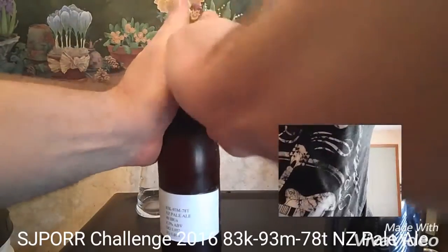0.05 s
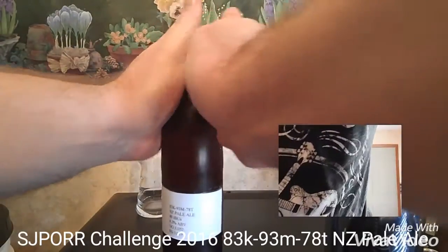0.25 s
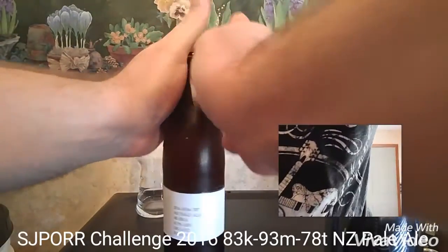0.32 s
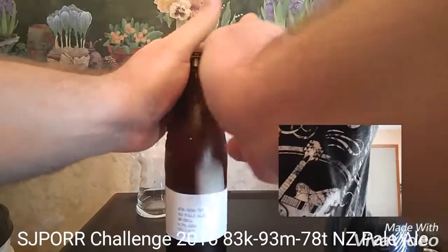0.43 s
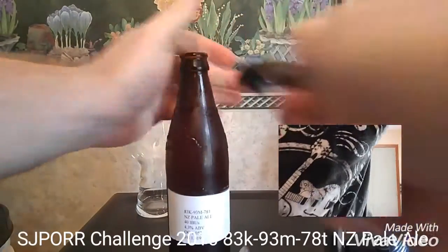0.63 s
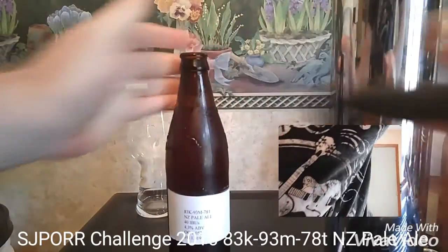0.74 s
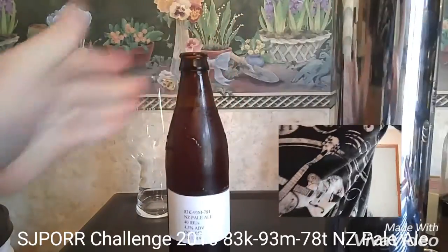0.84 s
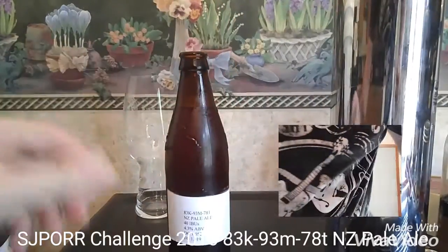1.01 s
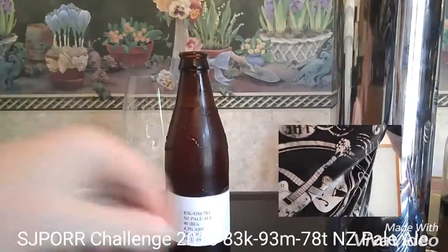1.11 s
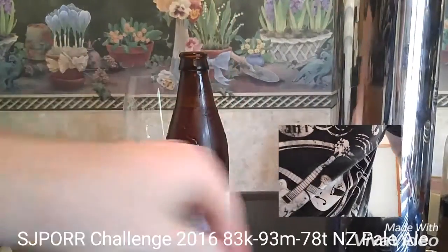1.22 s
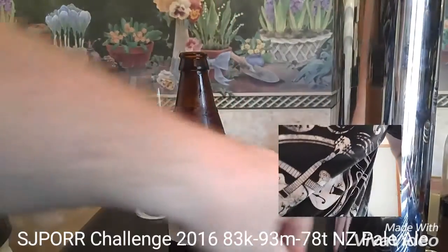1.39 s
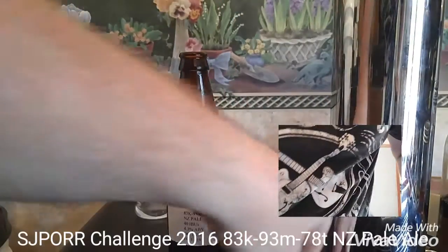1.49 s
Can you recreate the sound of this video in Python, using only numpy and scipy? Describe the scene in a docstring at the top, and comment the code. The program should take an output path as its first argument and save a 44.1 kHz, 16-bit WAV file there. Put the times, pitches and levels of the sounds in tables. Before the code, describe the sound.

A glass bottle is opened close by: steel scrapes and clinks at the neck until the cap pings free. Cap and opener then hit a tabletop with a loud knock and a few ringing bounces, echoing briefly in a quiet room.

```python
"""In a small, quiet room a steel opener levers the crown cap off a glass bottle.
First the opener scrapes and clinks at the neck and the hands bump the bottle; the cap pings free.
Then opener and cap drop and bounce: the table top knocks, the opener rings and the cap jingles.
Last, the opener rattles to rest and fingers brush it. The room rings on after each blow."""
import sys
import numpy as np
from scipy import signal
from scipy.fft import rfft, irfft
from scipy.io import wavfile
from scipy.ndimage import uniform_filter1d

SR = 44100
rng = np.random.default_rng(int(sys.argv[2]) if len(sys.argv) > 2 else 0)


def digitize_waveform(pressure):
    """Quantize a signal to 16-bit integers and store it at the path in sys.argv[1].

    Rows of a 2-D input are taken as channels; values are limited to [-1, 1].
    """
    field = np.atleast_2d(pressure).T
    bounded = np.clip(field, -1, 1)
    quanta = np.round(bounded * 32767).astype(np.int16)
    wavfile.write(sys.argv[1], SR, quanta)


N = 68355
T = np.arange(N) / SR
CRACK_RISE_S = 0.00069

# The tones of the steel opener and of the table top: pitch_hz, level_db, fade_s (time to fall 60 dB)
OPENER_TONES = [(3676, 2, .11), (3786, -11, .11), (3350, -22, 0.2), (4344, -35, .12), (7240, -3.5, 0.052),
                (7365, 0, 0.064), (13000, -31, 0.093), (13900, -39, 0.096), (14600, -48, 0.096)]
TABLE_TONES = [(271, -17, 0.089), (142.2, -22, 0.068), (371, -16.5, 0.035), (458.4, -17.5, 0.089),
               (559.4, -9, 0.053), (635.6, 0, 0.036), (671.2, 2, 0.058), (783, -8, 0.057),
               (884, -21, 0.067), (1107, -19.5, 0.019)]


def from_db(db):
    """Turn decibels into a gain."""
    return 10 ** (np.asarray(db) / 20)


def at_hz(points, hz):
    """Read between the rows of a table, with every octave equally wide."""
    pitches, values = np.transpose(points)
    return np.interp(np.log(np.maximum(hz, 1)), np.log(pitches), values)


def stereo_gains(hz):
    """How strong each pitch is on the left and on the right."""
    # Lean to one side: pitch_hz, left_minus_right_db
    balance = [(60, 10), (300, 1.5), (650, -2.5), (3000, 1), (7000, -1.5), (9000, 1), (14000, 1.5)]
    return from_db(np.array([[1], [-1]]) * at_hz(balance, hz) / 2)


def noise(colour, drive=1.0):
    """Stereo noise of strength 1. Its colour lists a level for each pitch; a drive can make it grainy."""
    # How alike left and right are: pitch_hz, likeness (0 to 1)
    likeness = [(40, 0), (120, 0.33), (300, 0.65), (700, 0.52), (1300, 0), (16000, 0.07)]
    hz = np.arange(N + 1) * SR / (2 * N)
    middle, side = rfft(rng.standard_normal((2, N)) * drive, 2 * N)
    alike = at_hz(likeness, hz)
    pair = np.sqrt(1 + alike) * middle + np.sqrt(1 - alike) * side * [[1], [-1]]
    sound = irfft(pair * stereo_gains(hz) * from_db(at_hz(colour, hz)))[:, :N]
    return sound / np.sqrt(np.mean(sound ** 2))


def envelope(start_s, rise_s, hold_s, fade_s):
    """A level that rises, holds, then falls 60 dB in fade_s."""
    age = np.maximum(T - start_s, 0)
    return np.minimum(age / rise_s, 1) * from_db(-60 * np.maximum(age - hold_s, 0) / fade_s)


def swell(peak_s, half_length_s):
    """A smooth rise and fall."""
    return np.exp(-.5 * ((T - peak_s) / half_length_s) ** 2)


def ring(tones, start_s, db, tilt_db=0, fade_share=1, hold_s=0):
    """A struck object: each of its tones swells within a few cycles and dies away."""
    # How far the left wave runs ahead of the right: pitch_hz, lead_radians
    left_lead = [(300, 1.1), (700, 0.6), (3700, 1.43), (7000, 0.72), (14000, 3.2)]
    rise_cycles = 2.36
    sound = np.zeros((2, N))
    for k, (hz, level_db, fade_s) in enumerate(tones):
        phase = 2 * np.pi * hz * (T - start_s) + k * np.pi
        stereo_shift = np.array([[.5], [-.5]]) * at_hz(left_lead, hz)
        gain = from_db(db + level_db + tilt_db * np.log2(hz / tones[0][0]))
        shape = envelope(start_s, rise_cycles / hz, hold_s, fade_s * fade_share)
        sound += gain * stereo_gains(hz) * shape * np.sin(phase + stereo_shift)
    return sound


def air():
    """Steady room murmur. A set curve acts as a recorder's gain control: down after the bounces, then up."""
    # Colour of the murmur: pitch_hz, level_db
    colour = [(25, -42), (55, -11.5), (85, -15), (130, -11.5), (200, -11), (290, -7), (346, -2.5),
              (400, -8), (490, -20.5), (580, -14.5), (650, -3.5), (765, -11.5), (900, -16.5), (1130, -21.5),
              (1800, -22.5), (3500, -32), (6400, -34.5), (7100, -29), (8600, -31.5), (10400, -38.5),
              (16000, -43.5)]
    # The gain curve: time_s, level_db
    gain_curve = [(0, -42), (.25, -43), (.52, -44), (1.0, -52), (1.15, -47.5), (1.3, -45), (1.55, -44)]
    return from_db(np.interp(T, *np.transpose(gain_curve))) * noise(colour)


def room_echo(sound):
    """Reflections blur together and die away, each band of pitches at its own speed."""
    # How long the room rings: pitch_hz, fade_s
    fade_times = [(150, 0.14), (700, 0.58), (2000, 0.35), (4000, 0.4746), (8500, 0.3), (15000, 0.42)]
    # How strongly it rings: pitch_hz, level_db
    levels = [(150, -11), (300, -12.5), (650, -17), (1100, -6.5), (2000, -10), (3700, -3), (7000, -6.5),
              (8500, -1), (14000, -15.5)]
    edges_hz = np.geomspace(60, 17000, 17)
    hiss = [noise([(20, 0), (20000, 0)]) for _ in range(2)]
    echo = 0
    for k, (low, high) in enumerate(zip(edges_hz, edges_hz[1:])):
        hz = np.sqrt(low * high)
        band = signal.sosfilt(signal.butter(2, [low, high], "band", fs=SR, output="sos"), hiss[k % 2])
        fade = envelope(start_s=0.003, rise_s=CRACK_RISE_S, hold_s=0, fade_s=at_hz(fade_times, hz))
        echo += from_db(at_hz(levels, hz)) * band * fade / np.sqrt(np.sum(fade ** 2))
    mono = sound.sum(axis=0, keepdims=True) / np.sqrt(2)
    return signal.fftconvolve(mono, echo, axes=1)[:, :N]


def hand_bumps():
    """The hands push the bottle against the table with soft, low bumps."""
    # Pushes: peak_s, half_length_s, pitch_hz, level_db
    pushes = [(0.121, 0.012, 165, -43.5), (0.37, 0.021, 58, -54)]
    sound = 0
    for peak_s, half_length_s, hz, db in pushes:
        rumble = noise([(hz / 2, -20), (hz, 0), (hz * 2, -20), (hz * 10, -80)])
        sound += from_db(db) * swell(peak_s, half_length_s) * rumble
    return sound


def scrapes():
    """Steel rubs in tiny slips: the opener scrapes the cap, rattles to rest and is brushed by fingers."""
    # Strokes: peak_s, half_length_s, dull_db, bright_db
    strokes = [(0.027, 0.01, -42, -44), (0.129, 0.0047, -51, -57), (0.198, 0.0071, -41.5, -43),
               (.322, 0.016, -52, -36), (0.461, 0.014, -58, -39.5), (0.945, 0.03, -38, -48),
               (1.269, 0.00099, -66, -58), (1.322, 0.00097, -58, -50)]
    # Colours of the dull and the bright rasp: pitch_hz, level_db
    dull_colour = [(500, -10), (1500, -19), (2600, -14), (3250, 5), (3900, -5), (4500, -6.5), (6000, -26),
                   (15000, -16.5)]
    bright_colour = [(2000, -12.5), (4400, -36), (5900, -5.5), (6450, 0), (6750, 0.5), (7300, -1),
                     (7900, -7.5), (8600, 5), (9600, -8), (11200, -9.5), (12500, -20), (16000, -24)]
    slips_per_s = 9800
    slips = rng.random(N) < slips_per_s / SR
    dull, bright = noise(dull_colour, slips), noise(bright_colour, slips)
    return sum(swell(peak_s, half_length_s) * (from_db(dull_db) * dull + from_db(bright_db) * bright)
               for peak_s, half_length_s, dull_db, bright_db in strokes)


def neck_clinks():
    """The opener ticks on the neck: steel and glass ring, the bottle knocks the table, the cap pings."""
    # Clinks: start_s, tick_db, tick_tilt_db_per_octave, knock_db, opener_db, opener_tilt_db_per_octave,
    # fade_share (how much of the opener's ring time the hand leaves), bottle_db, cap_ping_db
    clinks = [(0.118, -54, -1, -32.5, -71, 0, .5, -56, -76),
              (0.2035, -23, -2.5, -33.5, -24, 14.5, 0.26, -25, -66),
              (0.296, -20, -1, -24.5, -48, -1, 0.44, -32.5, -27.5),
              (0.3394, -16, 1, -63, -20, 7.5, 1, -26.5, -3.5),
              (0.3805, -50, 4, -56, -21, -28, 0.33, -39, -42)]
    # Colour of the tick: pitch_hz, level_db
    tick_colour = [(200, -24.5), (1200, -10.5), (2600, -9), (4200, -6), (5500, 3.5), (9000, 9),
                   (11000, 6.5), (15500, 2.5)]
    # The glass bottle's tones, and the cap's ping as it comes free: pitch_hz, level_db, fade_s
    bottle_tones = [(2060, -13, 0.098), (950, -10, 0.038), (4660, -4.5, 0.034), (4970, -4.5, 0.04),
                    (5570, -7, .02), (8280, -4, 0.022), (8840, 0, 0.047), (11620, 1, 0.034)]
    cap_ping_tones = [(6883, 0, 0.034), (6830, -28, 0.063), (6960, -45, 0.038)]
    sound = 0
    for (start_s, tick_db, tick_tilt, knock_db, opener_db, opener_tilt,
         share, bottle_db, cap_ping_db) in clinks:
        tick = noise([(hz, db + tick_tilt * np.log2(hz)) for hz, db in tick_colour])
        sound += from_db(tick_db) * envelope(start_s, CRACK_RISE_S, hold_s=0.0011, fade_s=0.043) * tick
        sound += ring(TABLE_TONES, start_s, knock_db)
        sound += ring(OPENER_TONES, start_s, opener_db, opener_tilt, fade_share=share)
        sound += ring(bottle_tones, start_s, bottle_db)
        sound += ring(cap_ping_tones, start_s, cap_ping_db)
    return sound


def table_bounces():
    """Each bounce chatters briefly: the table thuds and rings, the cap jingles, the opener rings."""
    # Bounces: start_s, chatter_s, thud_db, table_db, table_tilt_db_per_octave, clack_db, cap_db,
    # opener_db, opener_tilt_db_per_octave
    bounces = [(0.5568, .016, -12.5, -0.5, -6.5, -15.5, -9, -24, 0.5),
               (0.7194, 0.0059, -17.5, -10, 1, -20.5, -9.5, -26.5, 7),
               (0.8374, 0.01, -31.5, -18.5, 5.5, -22.5, -34, -23.5, -0.5),
               (0.8906, .001, -60, -29.5, 6.5, -29, -28, -37, 4),
               (0.9057, 0.0019, -60, -22.5, 6, -20.5, -12.5, -20, 1.5)]
    # Colours of the dense, short-lived vibrations: pitch_hz, level_db
    thud_colour = [(30, -8), (90, -32), (135, -15.5), (190, -28), (275, -1), (390, 2), (440, -8), (600, 4),
                   (800, -2.5), (1300, -22), (4000, -39)]
    clack_colour = [(150, -28), (500, -4), (900, -3), (1400, 0), (2800, -2.5), (3500, 0), (4300, -5.5),
                    (6000, -8), (10000, -12.5), (16000, -27)]
    jingle_colour = [(1500, -60), (4500, -18), (6000, -7.5), (7000, -8), (7700, -6.5), (8200, 2.5),
                     (8800, 0.5), (9600, -9.5), (11500, -13), (12500, -13), (16000, -19)]
    thud, clack, jingle = noise(thud_colour), noise(clack_colour), noise(jingle_colour)
    # The cap's clear tones: pitch_hz, level_db, fade_s
    cap_tones = [(8720, 6, 0.044), (9000, -8, 0.038), (8300, -12, 0.029), (8750, 8, 0.048),
                 (6150, 5, 0.046), (10200, -8, .08)]
    sound = 0
    for (start_s, chatter_s, thud_db, table_db, table_tilt,
         clack_db, cap_db, opener_db, opener_tilt) in bounces:
        sound += from_db(thud_db) * envelope(start_s, rise_s=0.0017, hold_s=chatter_s, fade_s=0.063) * thud
        sound += from_db(clack_db) * envelope(start_s, CRACK_RISE_S, chatter_s / 2, fade_s=0.065) * clack
        sound += from_db(cap_db) * envelope(start_s, CRACK_RISE_S, chatter_s / 2, fade_s=0.056) * jingle
        sound += ring(cap_tones, start_s, cap_db - 18)
        sound += ring(TABLE_TONES, start_s, table_db, table_tilt, hold_s=0.0027)
        sound += ring(OPENER_TONES, start_s, opener_db, opener_tilt)
    return sound


def scene():
    """Opening and bouncing over the murmur of air; the bounces reach the room more strongly."""
    in_hand = scrapes() + hand_bumps() + neck_clinks()
    on_table = table_bounces()
    into_room = from_db(-4) * in_hand + from_db(1) * on_table
    return in_hand + on_table + air() + room_echo(into_room)


def record(dry):
    """Cut the deep bass, turn the loudest blows down briefly, round the peaks and cut the top treble."""
    bass_cut_hz, treble_cut_hz = 43.2, 15600
    limit_db, cut_share, window_s, recovery_db_per_s = -10.5, 0.69, 0.009, 171
    sound = signal.sosfilt(signal.butter(2, bass_cut_hz, "high", fs=SR, output="sos"), dry)
    power = uniform_filter1d(np.mean(sound ** 2, axis=0), int(window_s * SR))
    level_db = 10 * np.log10(np.abs(power) + 1e-12)
    wanted_cut_db = np.maximum(level_db - limit_db, 0) * cut_share
    # The cut takes hold at once, then lets go at a steady rate.
    recovery_db = recovery_db_per_s * T
    cut_db = np.maximum.accumulate(wanted_cut_db + recovery_db) - recovery_db
    rounded = np.tanh(sound * from_db(-cut_db))
    return signal.sosfilt(signal.ellip(10, .1, 80, treble_cut_hz, fs=SR, output="sos"), rounded)


dry = scene()
out = record(dry)
digitize_waveform(out)
```